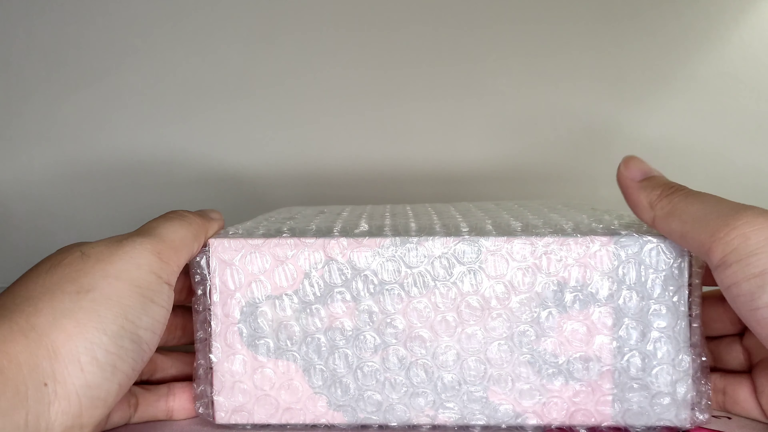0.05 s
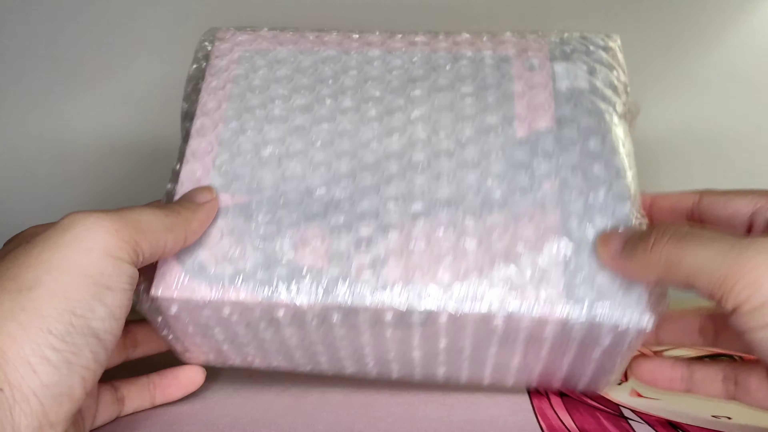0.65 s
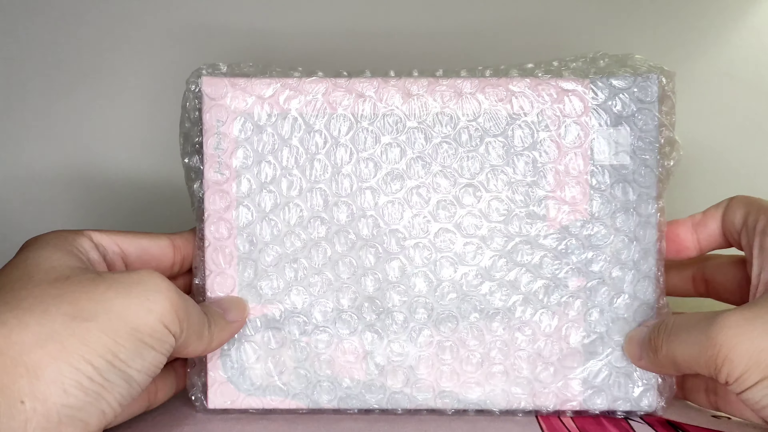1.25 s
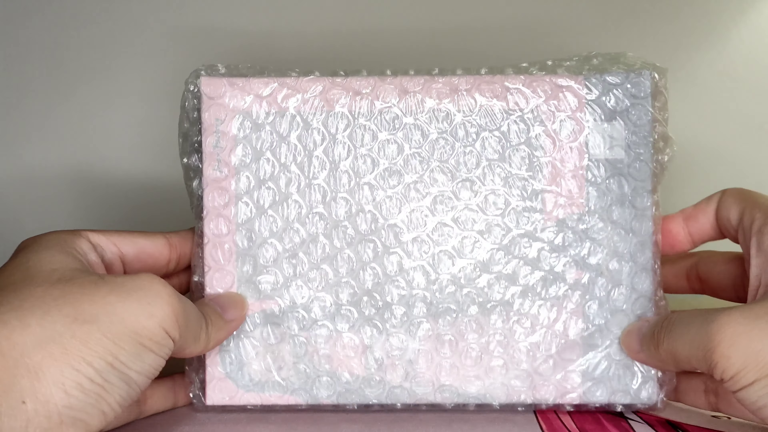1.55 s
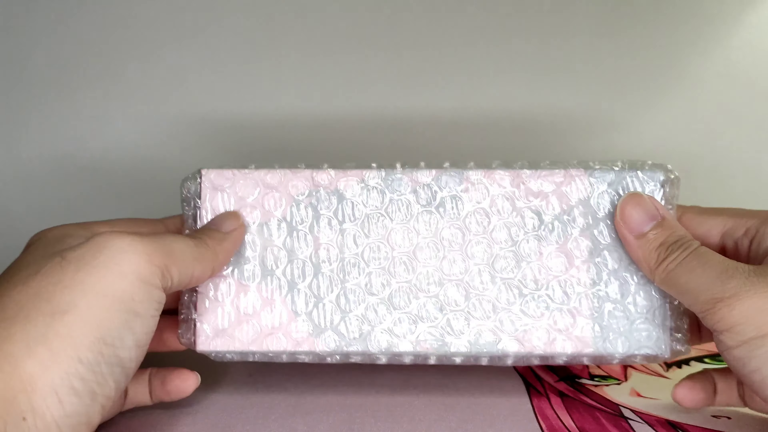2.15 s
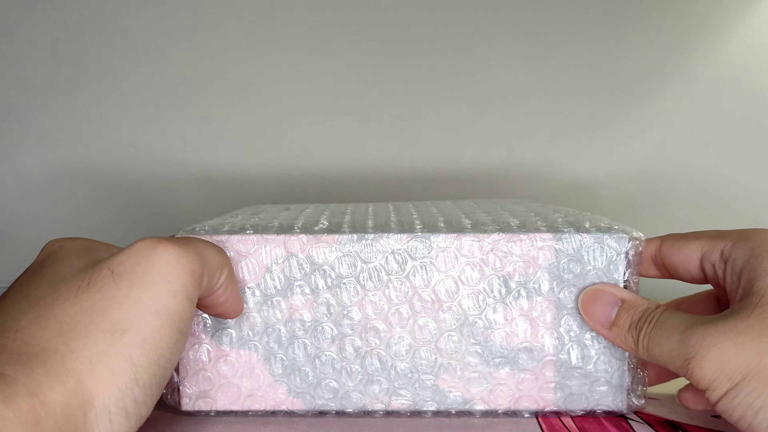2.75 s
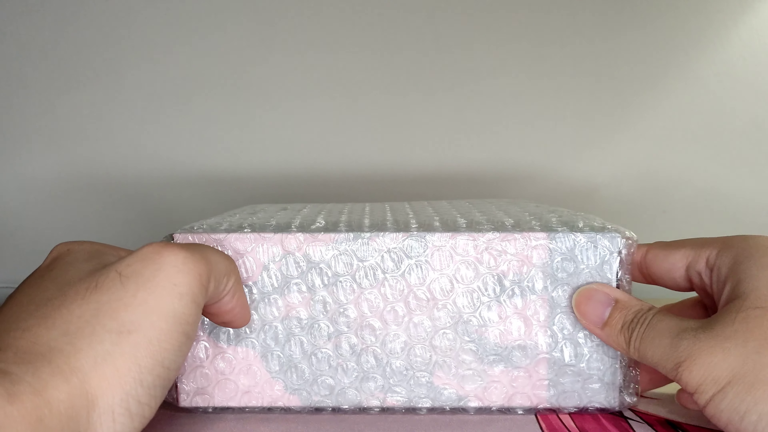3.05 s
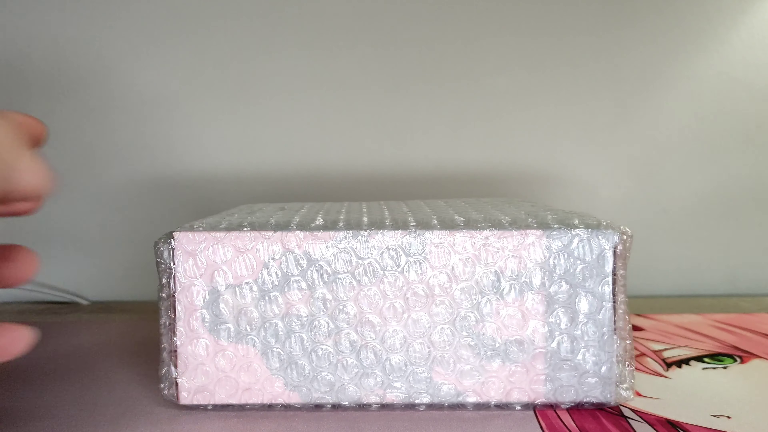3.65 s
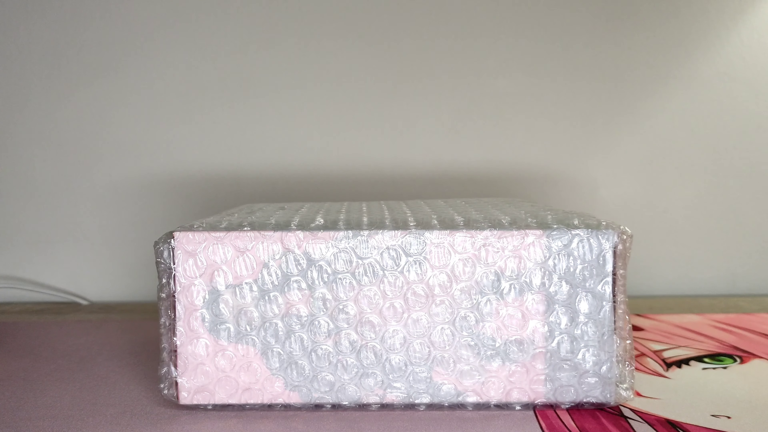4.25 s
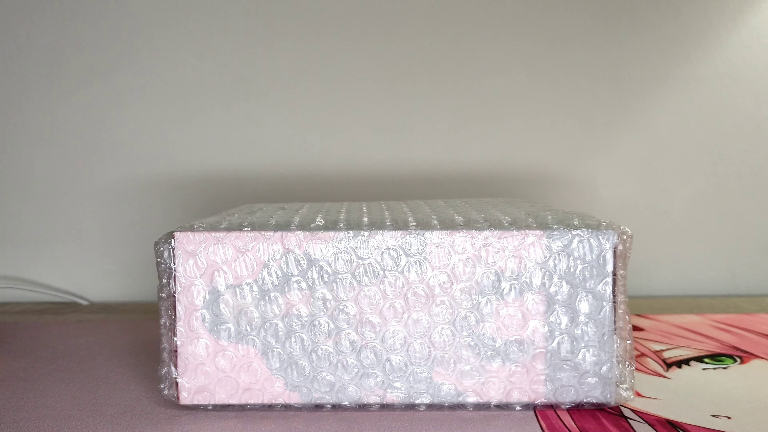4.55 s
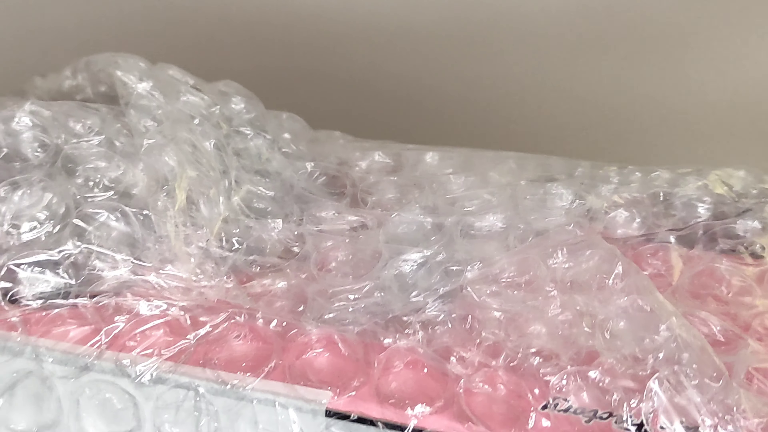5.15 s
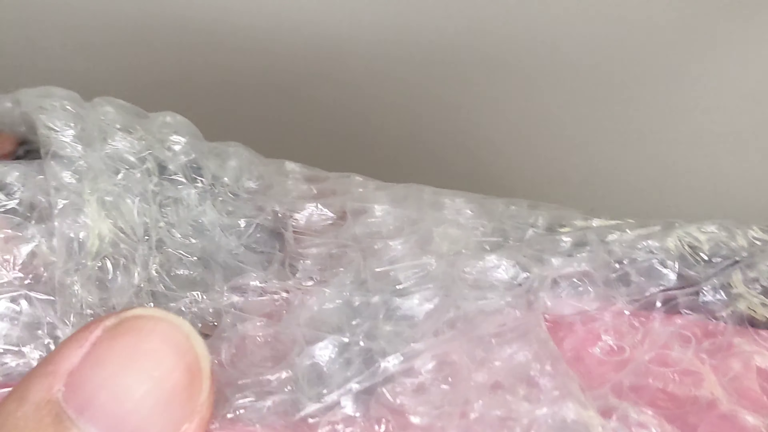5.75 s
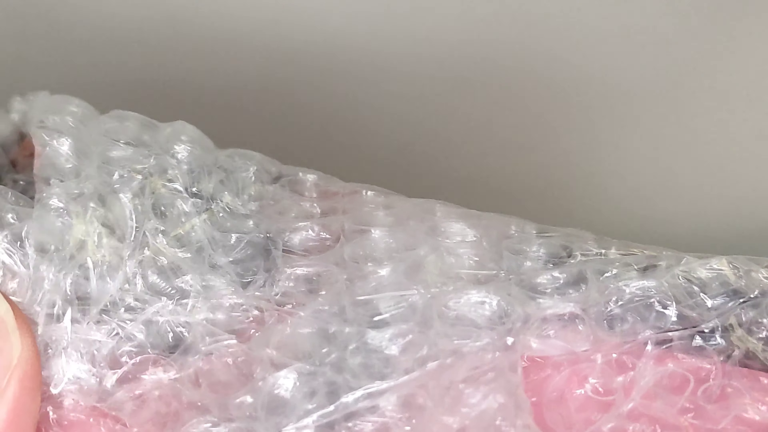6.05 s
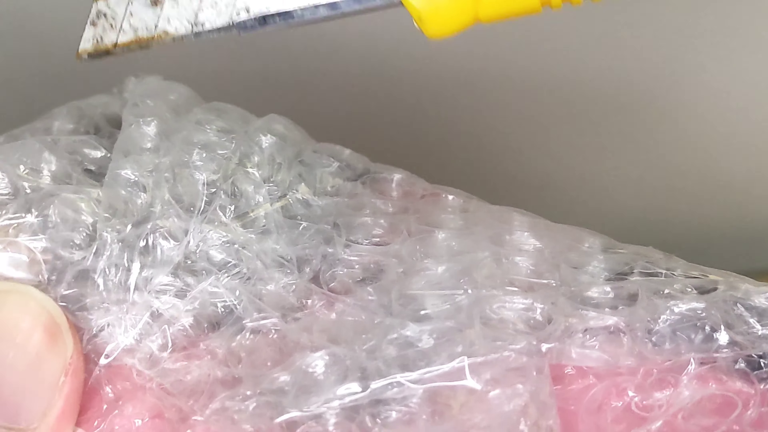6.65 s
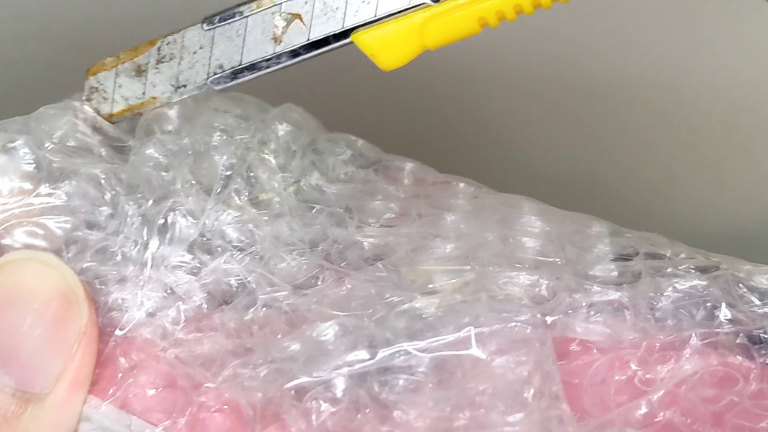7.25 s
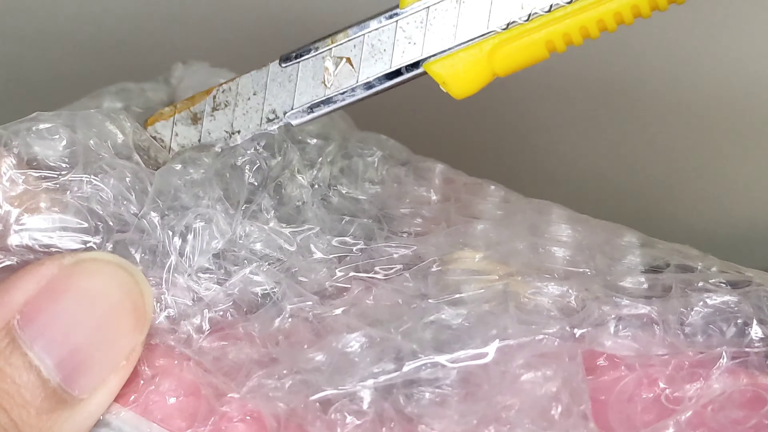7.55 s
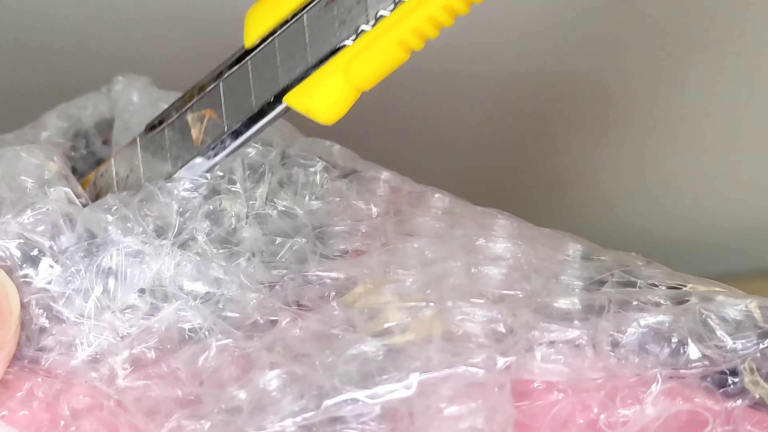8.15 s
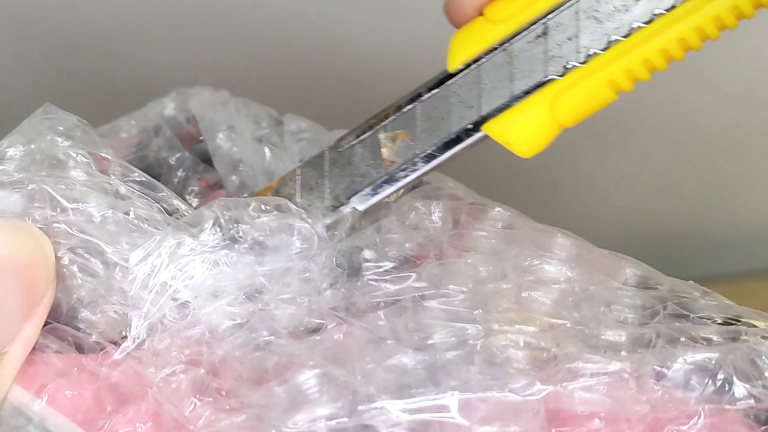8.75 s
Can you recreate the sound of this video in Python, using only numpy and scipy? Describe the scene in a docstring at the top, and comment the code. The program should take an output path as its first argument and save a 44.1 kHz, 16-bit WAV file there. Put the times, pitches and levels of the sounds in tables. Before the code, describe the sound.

Bubble wrap crinkles and scuffs close to the microphone as hands turn a cardboard box, over the faint low hum of a small room. At about 0.9 seconds the box bumps the desk with a low thump and hollow taps. Crackles, sharp crease snaps and lighter taps continue, with a short finger rasp at 2.1 and softer bumps around 2.3 and 2.7. The handling thins out, with a faint plastic squeak near 4, then drops to a moment of total silence just before 5. From 5.4 fingers press the crackling wrap again, and something gives a dull, rattling clatter around 5.9. Between 6.5 and 6.8 a snap-off knife slides out with about seven quick, bright steel clicks, the loudest sounds, and one more click follows at 7.6. The blade works into the plastic with uneven crinkling and snaps until about 8.8 seconds.

```python
"""A desk in a small room, where hands turn a bubble-wrapped cardboard box and set it down.
The film crinkles and scuffs as its creases snap over; the panels ring under taps and the box bumps
the desk. After a moment of silence fingers press the wrap, something clatters dully, a snap-off
knife clicks out along its ratchet, and the blade starts to work into the film."""
import sys
import numpy as np
from scipy import signal
from scipy.fft import rfft, irfft
from scipy.io import wavfile
from scipy.ndimage import uniform_filter1d

SR = 44100
rng = np.random.default_rng(int(sys.argv[2]) if len(sys.argv) > 2 else 0)


def put_to_file(sound):
    """Save the sound as 16-bit audio at rate SR, in the file named by the first command-line argument."""
    columns = np.atleast_2d(sound).T  # one column per channel
    safe = np.clip(columns, -1, 1)
    whole_steps = np.round(safe * 32767)
    wavfile.write(sys.argv[1], SR, whole_steps.astype(np.int16))


N = 388521
T = np.arange(N) / SR
TOP_HZ = 7590  # high cut on the whole scene


def amp(db):
    """Decibels to gain."""
    return 10 ** (np.asarray(db) / 20)


def unit_rms(x):
    """Scales to rms 1."""
    return x / np.sqrt(np.mean(x ** 2) + 1e-20)


def unit_peak(x):
    """Scales to peak 1."""
    return x / abs(x).max()


def curve_at(points, hz):
    """Reads a curve on a log-frequency axis."""
    freq_hz, value = np.transpose(points)
    return np.interp(np.log(hz + 1), np.log(freq_hz + 1), value)


def equalise(x, eq, size=4096):
    """Minimum-phase EQ, so attacks stay sharp; it falls away above TOP_HZ."""
    hz = abs(np.fft.fftfreq(size, 1 / SR))
    high_cut_db = np.clip((hz - TOP_HZ) / 40, 0, 40)
    log_gain = np.log(amp(curve_at(eq, hz) - high_cut_db))
    impulse = np.fft.ifft(np.exp(np.conj(signal.hilbert(log_gain)))).real
    return signal.fftconvolve(x, impulse[:size // 2])[:len(x)]


def wander(per_s):
    """Random drift of rms 1 that turns per_s times a second."""
    return unit_rms(np.interp(T * per_s, np.arange(8000), rng.standard_normal(8000)))


def crackle(eq, per_s, spread_db, clump_db, ring_s, facets=12):
    """Clumps of tiny uneven clicks, held at a steady level; each facet of film has its own short ring."""
    size = amp(spread_db * np.minimum(rng.exponential(1, N), 4) + clump_db * wander(130))
    clicks = size * (rng.random(N) < per_s / SR) * rng.choice([-1, 1], N)
    facet, t = rng.integers(0, facets, N), T[:256]
    rings = rng.standard_normal((facets, len(t))) * np.exp(-t / ring_s)
    grains = sum(signal.oaconvolve(clicks * (facet == k), unit_rms(rings[k]))[:N] for k in range(facets))
    texture = equalise(grains, eq)
    return texture / np.sqrt(abs(uniform_filter1d(texture ** 2, size=4000)) + 1e-12)


def burst(eq, ring_s, ring_db):
    """A sharp click with a short noisy ring, coloured a little differently each time."""
    t = T[:3000]
    click = 1. * (t == 0)
    onset = 1 - np.exp(-(t / ring_s * 2) ** 2)
    ringing = amp(ring_db) * rng.standard_normal(len(t)) * np.exp(-t / ring_s) * onset
    size = np.std(unit_peak(equalise(click, eq))) * np.linalg.norm(click + ringing)
    return size * unit_rms(equalise(click + ringing, eq))


def ring(modes, detune, rise_s):
    """Damped modes, peak 1; pitch and strength vary with where the blow lands."""
    t = T[:SR // 2]
    body = np.zeros(len(t))
    for k, (hz, db, t60_s) in enumerate(modes):
        stray_db, bend = rng.standard_normal(2)
        decay = amp(db + stray_db - 60 * t / t60_s)
        polarity = (-1) ** (k // 2)
        body += polarity * decay * np.sin(2 * np.pi * hz * (1 + detune * bend) * t)
    return unit_peak(body * (1 - np.exp(-t / rise_s)))


def add(mix, start_s, sound):
    """Mixes a sound in at start_s."""
    part = mix[max(round(start_s * SR), 0):][:len(sound)]
    part += sound[:len(part)]


# Room tone EQ: freq_hz, gain_db
ROOM_TONE_EQ = [(15, -44.5), (28, -10), (45, 5), (95, -2), (160, -5.5), (240, -4.5), (340, -7.5),
                (450, -15.5), (850, -19.5), (1150, -31.5), (2000, -33.5), (4200, -47.5), (7400, -42)]
def room_tone(level_db=-60, sway_db=1):
    """The low, steady murmur of the room."""
    gain = amp(level_db + sway_db * wander(10))
    return gain * unit_rms(equalise(rng.standard_normal(N), ROOM_TONE_EQ))


# Reverb time of the small room: freq_hz, t60_s
ROOM_DECAY = [(100, 0.54), (500, 0.3), (2000, 0.29), (7000, 0.37)]
def reverb(send, predelay_s=.008, echoes_per_s=3000):
    """Sparse reflections, each band dying at its own speed."""
    n = SR // 2
    echoes = rng.standard_normal(n) * (rng.random(n) < echoes_per_s / SR) * (T[:n] > predelay_s)
    hz, t, bands = signal.stft(echoes, SR, nperseg=256)
    decay = amp(-60 * t / curve_at(ROOM_DECAY, hz)[:, None])
    tail = signal.istft(bands * decay, SR, nperseg=256)[1]
    return signal.fftconvolve(send, tail / np.linalg.norm(tail))[:N]


def stick_slip(db, path, jitter, ratio, partner_db, flutter_db):
    """Start time and sound of a fluttering two-tone glide; uneven slips smear the pitch into a rasp."""
    times_s, hz = np.transpose(path)
    t = np.arange(times_s[0], times_s[-1], 1 / SR)
    unrest = unit_rms(uniform_filter1d(rng.standard_normal(len(t)), size=40))
    pitch_hz = uniform_filter1d(np.interp(t, times_s, hz), size=700) * (1 + jitter * unrest)
    phase = 2 * np.pi * np.cumsum(pitch_hz) / SR
    main, partner = (amp(flutter_db * wander(46)[:len(t)]) for _ in range(2))
    tone = unit_rms(main * np.sin(phase) + amp(partner_db) * partner * np.sin(ratio * phase))
    return times_s[0], amp(db) * tone * signal.windows.tukey(len(t), .3)


# A fingertip skid, quickening as it goes: time_s, pitch_hz
SKID_PATH = [(2.1, 921), (2.135, 1088), (2.17, 1186), (2.23, 1207)]
# Thin squeaks of the film: level_db, path of (time_s, pitch_hz)
FILM_SQUEAKS = [(-90, [(1.565, 7500), (1.61, 6600), (1.645, 5360)]), (-74.5, [(3.86, 6120), (3.91, 6760),
                (3.935, 6700), (3.965, 6620), (4.005, 7100), (4.055, 6330), (4.085, 6220), (4.125, 5800)])]
def film_friction(skid_db=-57):
    """Taut film rasps under a skidding finger, and squeaks faintly on two close pitches as it settles."""
    out = np.zeros(N)
    add(out, *stick_slip(skid_db, SKID_PATH, jitter=.13, ratio=2, partner_db=-1, flutter_db=3))
    for db, path in FILM_SQUEAKS:
        add(out, *stick_slip(db, path, jitter=.004, ratio=.89, partner_db=-3, flutter_db=4))
    return out


# Dull, midrange EQ of the clatter: freq_hz, gain_db
CLATTER_EQ = [(130, -36), (300, -12.5), (530, -2), (750, -7.5), (1050, -5.5), (1330, -6.5), (1520, -16),
              (1920, -4.5), (2500, -14), (3500, -21), (4100, -35), (6000, -80)]
# A knock and its rebounds: start_s, level_db
CLATTER_HITS = [(5.915, -30.5), (5.933, -35), (5.956, -34.5), (5.991, -36), (6.027, -39.5)]
def clatter(ring_s=0.0071, tail_s=0.074, tail_db=-12):
    """A dull, rattling knock that rebounds a few times."""
    out, t = np.zeros(N), T[:SR // 5]
    envelope = np.exp(-t / ring_s) + amp(tail_db) * np.exp(-t / tail_s)
    for start_s, db in CLATTER_HITS:
        hit = equalise(envelope * rng.standard_normal(len(t)), CLATTER_EQ)
        add(out, start_s, amp(db) * unit_peak(hit))
    return out


# Low modes of the box on the desk: pitch_hz, level_db, t60_s
DESK_MODES = [(92.4, 4, 0.27), (108, 1.5, 0.33), (203, -3.5, 0.31), (233.4, -4, 0.15), (306, -9, 0.14),
              (439, -7.5, 0.18)]
# The box meeting the desk: start_s, level_db
DESK_BUMPS = [(0.457, -47), (0.929, -29.5), (1.363, -49.5), (2.255, -38.5), (2.676, -36)]
def desk_bumps(lag_s=.0015):
    """Each bump shakes box and desk together."""
    out = np.zeros(N)
    for start_s, db in DESK_BUMPS:
        add(out, start_s + lag_s, amp(db) * ring(DESK_MODES, detune=0.028, rise_s=0.0027))
    return out


# EQs of dry finger contact and of the cardboard's body: freq_hz, gain_db
SCUFF_EQ = [(400, -18.5), (900, -0.5), (1400, 4.5), (2050, 5), (2700, 2.5), (3400, 0), (3900, -9),
            (6000, -26)]
CARDBOARD_EQ = [(120, -15), (260, -4), (450, -5), (750, -5.5), (1000, -10), (1400, -20.5), (2500, -33.5)]
# Modes of the cardboard panels: pitch_hz, level_db, t60_s
PANEL_MODES = [(245.8, 0, 0.047), (288, -17, 0.049), (430, 0, 0.097), (613, -9.5, 0.013),
               (692.6, -2, 0.098), (776, 7, 0.018), (916, -9.5, 0.19), (1126, -16.5, .03)]
# Fingers and corners tapping the box: start_s, level_db
BOX_TAPS = [(0.846, -37), (0.887, -36), (0.932, -27.5), (0.951, -26.5), (0.965, -38), (1.366, -31.5),
            (1.425, -34.5), (1.831, -37), (1.965, -39), (2.115, -36), (2.259, -36), (2.297, -36),
            (2.677, -35), (3.935, -48), (5.49, -36.5), (6.205, -39.5), (7.362, -41.5), (7.459, -42.5),
            (8.6927, -38)]
def box_taps(contact_db=-8, thud_db=-11, panel_db=-1, firm_db=-31, cushion=0.72, lag_s=.0015):
    """A tap is a dry contact tick, a dense thud and the cardboard's ring."""
    out = np.zeros(N)
    for start_s, db in BOX_TAPS:
        contact = amp(contact_db) * burst(SCUFF_EQ, ring_s=0.0036, ring_db=-17.5)
        thud = amp(thud_db) * burst(CARDBOARD_EQ, ring_s=0.0099, ring_db=-12)
        through_db = cushion * min(db - firm_db, 0)  # the bubbles cushion light taps
        panels = amp(panel_db + through_db) * ring(PANEL_MODES, detune=.04, rise_s=0.00078)
        for layer in (contact, thud, panels):
            add(out, start_s + lag_s, amp(db) * layer)
    return out


# Bright EQ of a crease: freq_hz, gain_db
CREASE_EQ = [(200, -8.5), (800, -15), (2000, -12.5), (3200, -8), (4200, -15.5), (5600, -11), (6200, -2.5),
             (7400, 0)]
# Accents in the crinkling: start_s, level_db
CREASE_SNAPS = [(0.0172, -40), (0.318, -44), (1.275, -35), (1.2872, -42.5), (1.3711, -36), (2.1788, -45),
                (2.4249, -42.5), (2.483, -47), (2.678, -43), (3.2569, -46.5), (4.134, -53.5), (4.33, -62),
                (4.561, -58), (5.492, -48), (5.514, -46.5), (6.3084, -37), (6.3274, -43), (6.34, -43),
                (6.4891, -35.5), (6.8473, -39.5), (6.961, -41.5), (7.008, -38.5), (7.0838, -42.5),
                (7.1883, -46), (7.363, -43), (7.4625, -49), (7.987, -43), (8.144, -45.5), (8.1694, -53),
                (8.6247, -34), (8.6966, -40.5), (8.7384, -44)]
def crease_snaps(boost_db=2.5, lag_s=.0011):
    """The strongest creases snap over, one click each."""
    out = np.zeros(N)
    for start_s, db in CREASE_SNAPS:
        add(out, start_s + lag_s, amp(db + boost_db) * burst(CREASE_EQ, ring_s=0.00089, ring_db=-13.5))
    return out


# Moves of the hands and, at the end, the blade: start_s, hold_s, crinkle_db, scuff_db, drum_db
WRAP_MOVES = [(0.036, 0.026, -56.5, -60, -55.5), (0.215, 0.41, -71, -69.5, -66),
              (0.754, 0.12, -60, -64, -59.5), (0.898, 0.02, -59.5, -59.5, -44),
              (1.14, .05, -72.5, -85, -83), (1.243, 0.098, -57, -63.5, -58),
              (1.453, 0.084, -64.5, -69, -60), (1.718, .06, -72, -78, -77), (1.82, .22, -62.5, -67, -59.5),
              (2.112, 0.081, -72, -64, -51), (2.237, 0.07, -61.5, -61.5, -55),
              (2.437, 0.049, -71, -67, -73), (2.677, .02, -58.5, -58, -58), (2.74, 0.1, -69, -66.5, -63),
              (2.96, 0.056, -76, -76, -68.5), (3.222, 0.14, -72, -70.5, -74),
              (3.689, 0.01, -61.5, -59.5, -51), (3.938, 0.13, -78.5, -87, -80.5),
              (5.358, 0.069, -78, -80, -69.5), (5.467, 0.18, -67.5, -71, -66), (5.752, 0.58, -60, -68, -63),
              (6.303, 0.34, -60.5, -74.5, -74), (6.87, 0.25, -68, -72.5, -73), (7.2, 0.12, -71, -79, -77),
              (7.323, 0.33, -66.5, -71, -68.5), (7.678, 0.17, -67.5, -72, -74),
              (7.973, 0.081, -64.5, -70, -80), (8.16, 0.049, -65.5, -75, -78),
              (8.276, 0.13, -62.5, -67, -68.5), (8.447, 0.18, -59, -66.5, -65.5),
              (8.69, 0.03, -63, -67, -72)]
def move_envelopes(rise_db_per_s=323, relax_db_per_s=107.5):
    """Crinkle, scuff and drum gains: the film tightens quickly under a move and relaxes slowly."""
    power = np.zeros((3, N))
    for start_s, hold_s, *levels_db in WRAP_MOVES:
        attack_db = rise_db_per_s * np.maximum(start_s - T, 0)
        release_db = relax_db_per_s * np.maximum(T - start_s - hold_s, 0)
        power += np.outer(amp(levels_db), amp(-attack_db - release_db)) ** 2
    return np.sqrt(power)


# Fizzy EQ of the thin film: freq_hz, gain_db
FILM_EQ = [(300, -32.5), (1000, -35.5), (2100, -15), (3300, -14), (3900, -18), (5000, -16.5), (5700, -12),
           (6100, -7.5), (7400, -2)]
def bubble_wrap(tick_db=-27, scuff_db=-2, drum_db=-4):
    """The film fizzes and ticks, scuffs under the fingers and drums on the box."""
    crinkling, scuffing, drumming = move_envelopes()
    fizz = crackle(FILM_EQ, per_s=1700, spread_db=-3, clump_db=3.5, ring_s=.0004)
    ticks = crackle(CREASE_EQ, per_s=55, spread_db=6, clump_db=2.5, ring_s=0.00027)
    scuff = crackle(SCUFF_EQ, per_s=1600, spread_db=0.5, clump_db=4, ring_s=0.00055)
    drum = crackle(CARDBOARD_EQ, per_s=700, spread_db=4, clump_db=-2, ring_s=0.0033)
    return (crinkling * fizz
            + amp(tick_db) * crinkling ** (2 / 3) * ticks  # under a gentle hand ticks outlast the fizz
            + amp(scuff_db) * scuffing * scuff
            + amp(drum_db) * drumming * drum)


# Steely EQ of the knife's slider: freq_hz, gain_db
SLIDER_EQ = [(100, -62), (400, -22), (800, -14), (1200, -23.5), (1500, -19.5), (2300, -19), (2950, -17.5),
             (3800, -26), (5000, -16.5), (5750, -12), (6150, -5), (6700, -8), (7350, 0)]
# The slider dropping into each notch: start_s, click_db, thump_db
RATCHET_NOTCHES = [(6.5542, -21, -35.5), (6.6244, -14, -20), (6.6509, -11, -22), (6.6746, -15.5, -23.5),
                   (6.709, -13, -22), (6.7339, -12, -19.5), (6.7661, -14.5, -25.5), (7.6143, -14.5, -24.5)]
def knife_ratchet(lag_s=0.0013, thump_s=0.0016, seat_s=0.001233, seat_db=-14):
    """Each notch gives a bright steel click and a weaker one as the spring seats."""
    out, age = np.zeros(N), T[:2000] / thump_s
    thump = -age * np.exp(1 - age)  # a short low thump as each click overloads the microphone
    for start_s, click_db, thump_db in RATCHET_NOTCHES:
        hit_s = start_s + lag_s
        add(out, hit_s, amp(click_db) * burst(SLIDER_EQ, ring_s=.0003, ring_db=-14))
        add(out, hit_s + seat_s, amp(click_db + seat_db) * burst(SLIDER_EQ, ring_s=0.0016, ring_db=-2.5))
        add(out, hit_s, amp(thump_db) * thump)
    return out


def scene(handling_send_db=-13, knife_send_db=-12, clatter_send_db=-9):
    """Everything plays close up, with a little of the room behind it."""
    handling = bubble_wrap() + crease_snaps() + box_taps() + desk_bumps() + film_friction()
    knife, knocks = knife_ratchet(), clatter()
    low_cut = signal.butter(2, 900, "high", fs=SR, output="sos")  # keeps the microphone thump dry
    send = (amp(handling_send_db) * handling
            + amp(knife_send_db) * signal.sosfilt(low_cut, knife)
            + amp(clatter_send_db) * knocks)
    return (handling + knife + knocks + reverb(send) + room_tone())[None]


def record(dry, low_hz=48, mute_s=4.891, resume_s=5.038, fade_s=0.18):
    """Bass roll-off, a brief silence after which the sound fades back in, and a steep high cut."""
    hz = np.fft.rfftfreq(N, 1 / SR)
    trimmed = irfft(rfft(dry) * hz ** 4 / (hz ** 4 + low_hz ** 4), N)
    fade_in = 1 - 0.66 * np.exp(-np.maximum(T - resume_s, 0) / fade_s)
    gate = np.where(T < mute_s, 1, fade_in * (T > resume_s))
    high_cut = signal.firwin(1023, TOP_HZ, window=("kaiser", 7), fs=SR)
    return signal.oaconvolve(trimmed * gate, high_cut[None], "same")


dry = scene()
out = record(dry)
put_to_file(out)
```